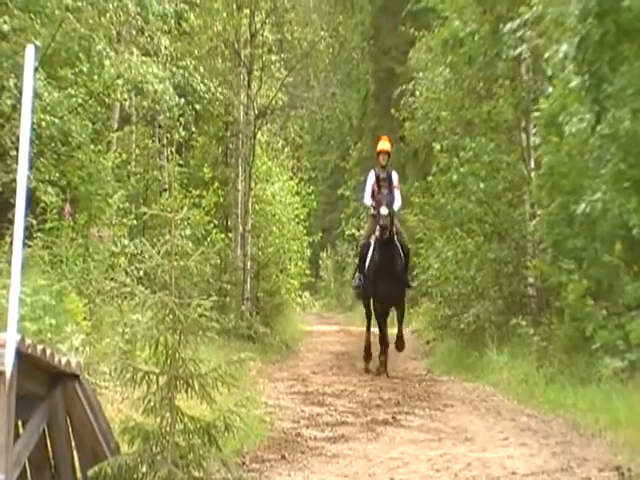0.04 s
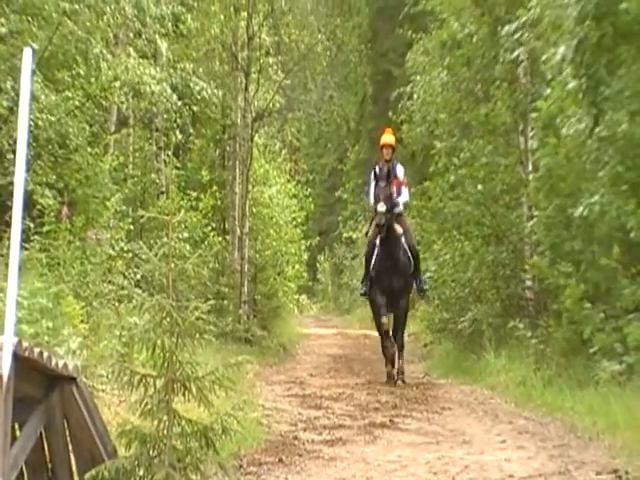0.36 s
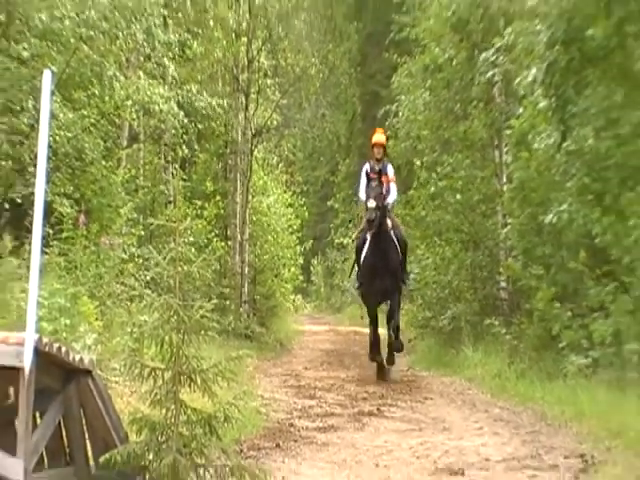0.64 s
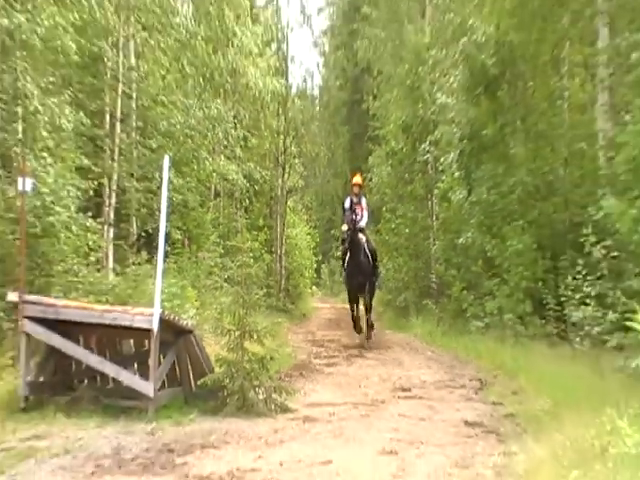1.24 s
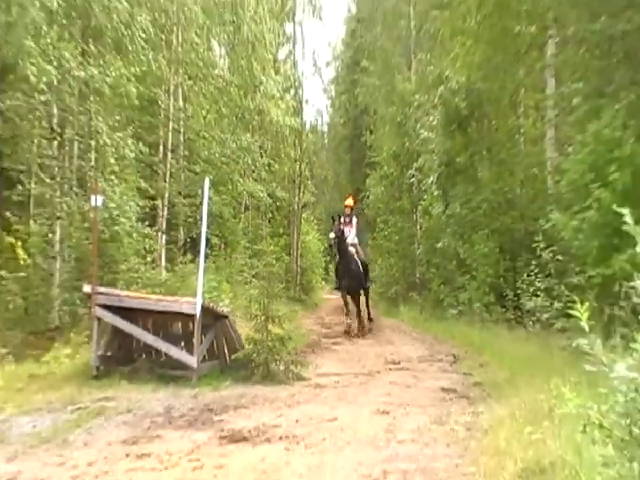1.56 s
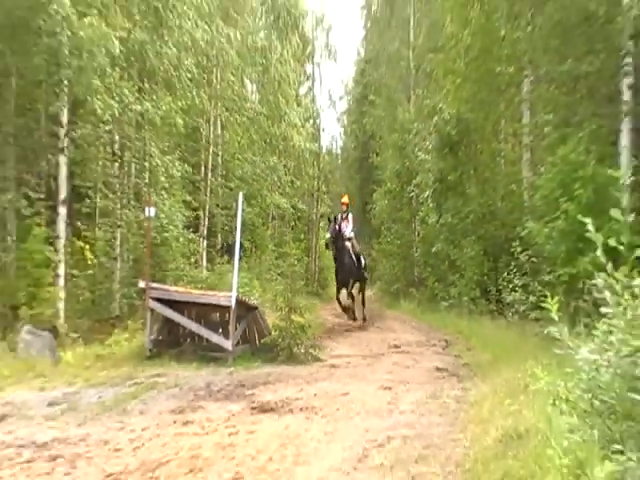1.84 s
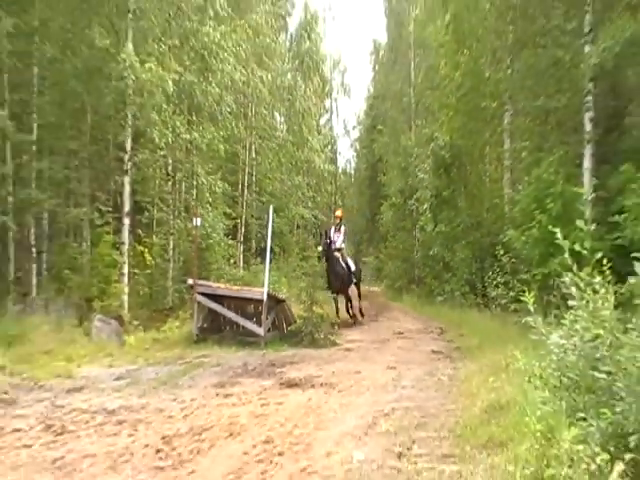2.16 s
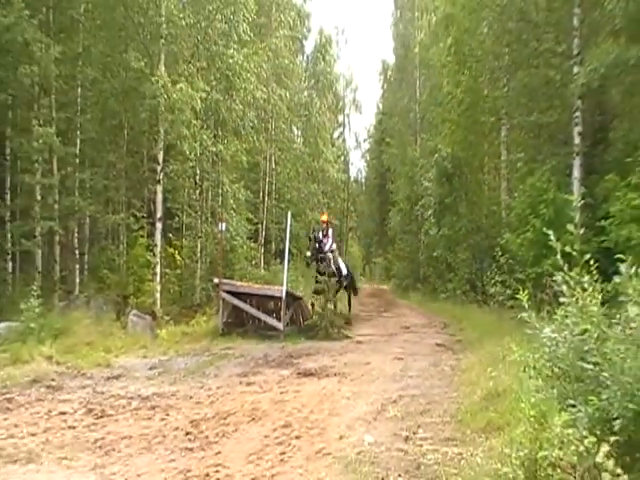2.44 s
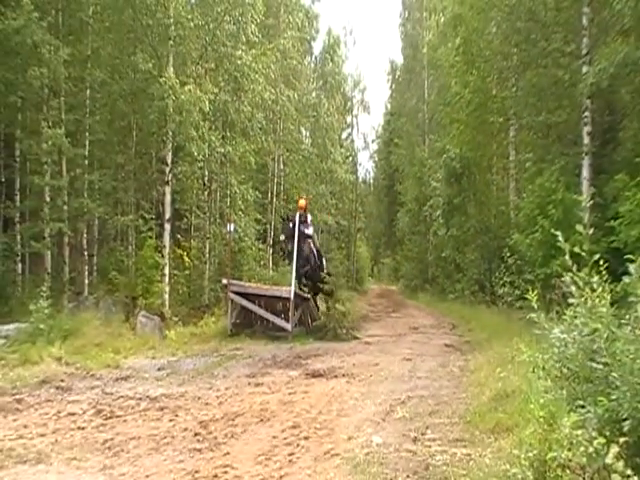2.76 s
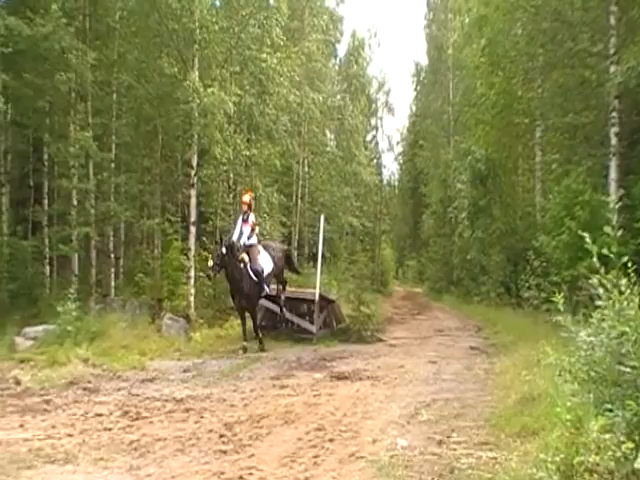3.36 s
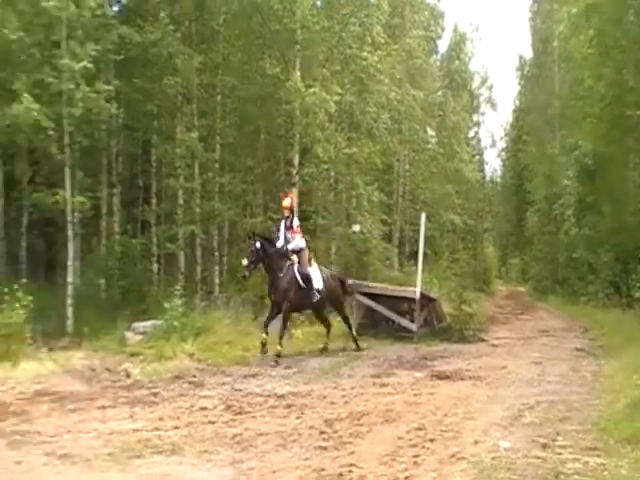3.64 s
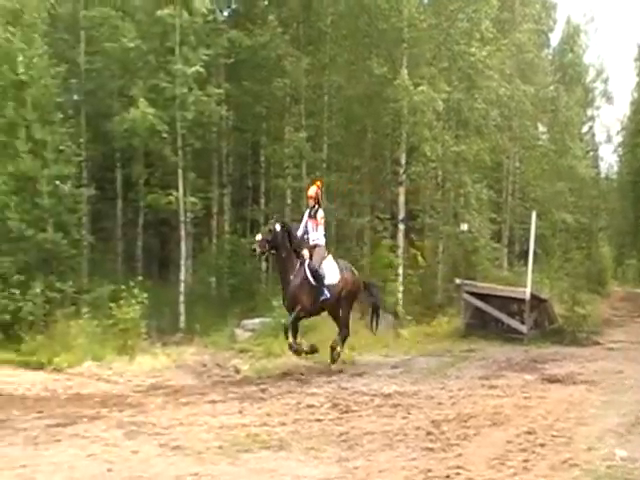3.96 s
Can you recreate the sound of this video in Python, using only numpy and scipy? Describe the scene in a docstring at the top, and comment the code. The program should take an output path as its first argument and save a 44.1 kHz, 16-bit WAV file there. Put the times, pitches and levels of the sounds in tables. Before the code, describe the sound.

A horse canters closer on a sandy forest track, its hooves thudding, crunching grit and clacking on stones, faint at first and louder from about 2 seconds. At 3 seconds a hoof raps a wooden fence. After the landing, at about 3.6 seconds, a steel shoe cracks loudly on stone and gravel sprays, then more hoofbeats follow. Leaves hiss softly throughout, with a slight echo and a few faint microphone clicks.

```python
"""A horse canters up a sandy forest track, jumps a wooden fence and lands close by.
Each hoof thuds into the ground, crunches grit and throws sand; some clack on stones.
A hoof raps the fence boards; after the landing a steel shoe cracks on a stone and gravel flies.
Leaves hiss, tree trunks echo the blows, and the microphone's casing clicks a few times."""
import sys
import numpy as np
from scipy import signal
from scipy.fft import rfft, irfft
from scipy.io import wavfile
from scipy.ndimage import uniform_filter1d

SR = 44100
rng = np.random.default_rng(int(sys.argv[2]) if len(sys.argv) > 2 else 0)


def store_wav(level_fs):
    """Save 16-bit WAV to argv[1]."""
    pcm = np.round(np.clip(np.atleast_2d(level_fs), -1, 1) * 32767)
    wavfile.write(sys.argv[1], SR, pcm.T.astype(np.int16))


N = 176400  # 4 seconds


def undb(db):
    """Turn decibels into a number to multiply by."""
    return 10 ** (np.asarray(db) / 20)


def unit(x):
    """Scale a sound to an average (rms) strength of 1."""
    return x / np.sqrt(np.mean(x ** 2))


def blow(x, db):
    """Scale a hit so that its loudest 4 ms have the given level."""
    power = uniform_filter1d(x ** 2, 176, mode="constant")
    return x * undb(db) / np.sqrt(power.max())


def colour(x, points, size=2048):
    """Shape the tone along a curve of (pitch_hz, gain_db) points; white noise keeps its power."""
    hz, db = np.array(points, float).T
    freqs = np.maximum(np.fft.rfftfreq(size, 1 / SR), 1)
    gains = undb(np.interp(np.log(freqs), np.log(hz), db))
    cepstrum = irfft(np.log(gains))
    cepstrum[1:size // 2] *= 2  # folded forward, so nothing sounds before a hit
    cepstrum[size // 2 + 1:] = 0
    response = irfft(np.exp(rfft(cepstrum)))
    return signal.fftconvolve(x, response / np.linalg.norm(response))[:len(x)]


def low_cut(x, hz, order=2):
    """Take away bass; small things give off little of it."""
    return signal.sosfilt(signal.butter(order, hz, "high", fs=SR, output="sos"), x)


def swell(t, rise_s, decay_s, power=1):
    """Rise in a straight line from t = 0, then fade; a power above 1 shortens the tail."""
    return np.clip(t / rise_s, 0, 1) * np.exp(-(np.maximum(t - rise_s, 0) / decay_s) ** power)


def ring(t, tones):
    """Add up fading tones (pitch_hz, gain_db, ring_s); each drops 60 dB in ring_s."""
    return sum(undb(db) * np.sin(2 * np.pi * hz * t) * np.exp(-np.log(1000) * t / ring_s)
               for hz, db, ring_s in tones)


def add(out, start_s, x):
    """Mix a sound in at its start time."""
    i = int(start_s * SR)
    out[i:i + len(x)] += x[:len(out) - i]


def clumps(per_s=160, depth_db=3):
    """A wobbling gain: soil gives way in uneven lumps."""
    steps = np.arange(N) * per_s / SR
    return undb(depth_db * np.interp(steps, np.arange(N), rng.standard_normal(N)))


def grains(spread_db, per_s=8300):
    """Many tiny collisions in clumps; more spread makes a few stand out."""
    strength = undb(spread_db * np.minimum(rng.standard_exponential(N), 5))
    return unit(clumps() * strength * rng.choice([-1, 1], N) * (rng.random(N) < per_s / SR))


def ticks(per_s=60, level_db=-12):
    """Lone pebbles click among the sand."""
    return unit(rng.uniform(-1.1, 1, N) * (rng.random(N) < per_s / SR)) * undb(level_db)


# tone of coarse grit: pitch_hz, gain_db
GRIT_TONE = [(60, -28), (200, -14.5), (380, -9.5), (580, 0), (800, -6.5), (1200, -6), (1700, -5.5),
             (2600, -14.5), (5000, -26), (11000, -50)]
# tone of fine sand: pitch_hz, gain_db
SAND_TONE = [(200, -53), (1000, -22), (2200, 0.5), (4300, 2.5), (6000, 0), (8500, 1), (10000, -3.5),
             (11500, -26)]
# hooves ploughing through the track: start_s, grit_db, sand_db, rise_s, decay_s
SCUFFS = [(-.01, -54.5, -59, 0.0088, 0.13), (0.054, -62, -54.5, 0.0062, 0.039),
          (0.152, -51, -48, 0.0028, 0.0094), (0.287, -61, -54.5, 0.0027, 0.083),
          (0.333, -53, -49.5, 0.016, 0.057), (0.467, -56, -63.5, 0.0052, 0.07),
          (0.548, -53, -50, 0.046, 0.13), (.68, -56.5, -58, 0.019, 0.12), (0.77, -55, -52.5, 0.031, 0.16),
          (0.998, -48.5, -57.5, 0.0056, 0.054), (1.07, -50.5, -67, 0.027, 0.047),
          (1.147, -53, -58.5, 0.0046, 0.094), (1.245, -53.5, -58, 0.0025, 0.045),
          (1.538, -41.5, -53, 0.005, 0.023), (1.674, -44.5, -69, 0.0025, 0.047),
          (1.772, -49.5, -50.5, 0.0026, 0.056), (1.902, -55.5, -64, 0.0025, 0.071),
          (1.954, -46, -59, 0.021, 0.019), (2.047, -43.5, -40, 0.0015, 0.043),
          (2.13, -43, -45, 0.0098, 0.022), (2.18, -42.5, -41.5, 0.0033, 0.046),
          (2.273, -52.5, -49.5, 0.0031, 0.27), (2.39, -36.5, -45.5, 0.0067, 0.033),
          (2.408, -34.5, -44.5, 0.0048, 0.036), (2.488, -37, -36, 0.014, 0.042),
          (2.573, -43, -44.5, 0.021, 0.028), (2.717, -74, -41, 0.0025, 0.14),
          (2.765, -35, -49, 0.0027, 0.016), (2.893, -51, -49.5, 0.003, 0.052),
          (2.965, -38, -48, 0.011, 0.02), (3.145, -40.5, -54, 0.0027, 0.016),
          (3.28, -41.5, -43.5, 0.017, 0.037), (3.354, -34, -35.5, 0.0018, 0.024),
          (3.389, -37.5, -43, 0.038, 0.032), (3.526, -34, -31.5, 0.0044, 0.017),
          (3.628, -34, -53, 0.011, 0.012), (3.749, -60, -38.5, 0.061, 0.018),
          (3.816, -40.5, -40.5, 0.0017, 0.068)]


def hoof_scuffs(t):
    """Coarse grit crunches under each hoof while fine sand hisses away."""
    grit_power, sand_power = 0, 0
    for start_s, grit_db, sand_db, rise_s, decay_s in SCUFFS:
        shape = swell(t - start_s, rise_s, decay_s, power=1.18)
        grit_power += (undb(grit_db) * shape) ** 2
        sand_power += (undb(sand_db) * shape) ** 2
    grit = grains(spread_db=2) * np.sqrt(grit_power)
    sand = (grains(spread_db=0) + ticks()) * np.sqrt(sand_power)
    return colour(grit, GRIT_TONE) + colour(sand, SAND_TONE)


# soil falling back behind the horse: time_s, level_db
TRICKLE_LEVELS = [(1.6, -58), (2.2, -58), (2.7, -49), (3.2, -52), (3.7, -51), (4, -55.5)]


def soil_trickle(t):
    """Kicked-up sand and grit patter down between the hoofbeats."""
    sand = colour(grains(spread_db=3), SAND_TONE)
    grit = colour(grains(spread_db=3), GRIT_TONE) * undb(-2)
    times_s, levels_db = np.array(TRICKLE_LEVELS).T
    return (sand + grit) * undb(np.interp(t, times_s, levels_db))


# tone of the leaves: pitch_hz, gain_db
LEAF_TONE = [(15, -84), (25, -38), (59, -56), (94, -16), (187, -3.5), (381, -8.5), (573, 0.5), (840, -3),
             (1060, -2.5), (1470, -9), (1670, -7.5), (2450, -12), (8310, -15.5), (9680, -21), (11000, -35),
             (14300, -4), (22000, -120)]


def leaves():
    """Leaves give a soft, steady hiss."""
    return colour(rng.standard_normal(N), LEAF_TONE) * undb(-58.5)


# tone of packed earth: pitch_hz, gain_db
EARTH_TONE = [(25, -4), (65, -10), (115, 2.5), (180, 1.5), (300, -1), (500, -0.5), (900, -15),
              (3000, -59.5)]
# weight coming onto a hoof: start_s, level_db, decay_s, pitch_hz
THUDS = [(0.061, -47.5, 0.011, 259), (0.344, -54, 0.014, 270), (0.472, -49.5, 0.019, 233),
         (0.603, -52.5, 0.018, 237), (1.004, -40.5, 0.0028, 236), (1.021, -41, 0.004, 327),
         (1.156, -48, 0.011, 240), (1.425, -40, 0.0089, 283), (1.553, -41.5, 0.0046, 230),
         (1.97, -48.5, 0.016, 172), (2.061, -44, 0.013, 274), (2.19, -46.5, 0.025, 202),
         (2.413, -54, 0.022, 286), (2.518, -41.5, 0.027, 222), (2.582, -39.5, 0.017, 167),
         (2.777, -37, 0.0053, 142), (3.32, -48, 0.035, 130), (3.357, -43, 0.01, 188),
         (3.537, -39.5, 0.046, 141), (3.638, -34, 0.017, 230), (3.821, -49, 0.024, 257)]


def hoof_thuds(t, rise_s=0.0027):
    """The ground takes the weight: one dull push and a short rumble of packed earth."""
    out = np.zeros(N)
    for start_s, level_db, decay_s, pitch_hz in THUDS:
        burst = rng.standard_normal(len(t)) * swell(t, rise_s, decay_s)
        earth = blow(colour(burst, EARTH_TONE), db=0)
        push = blow(np.sin(2 * np.pi * pitch_hz * t) * swell(t, rise_s, decay_s=0.0053), db=-2.5)
        add(out, start_s, blow(low_cut(earth, pitch_hz / 2) + push, level_db))
    return out


def trunk_echo(x, ring_s=0.47, top_hz=5400):
    """Tree trunks send back many small, duller reflections that die away."""
    t = np.arange(SR) / SR
    tail = rng.standard_normal(SR) * swell(t, ring_s / 40, ring_s / np.log(1000))
    dulling = signal.butter(1, top_hz, fs=SR, output="sos")
    tail = signal.sosfilt(dulling, tail / np.linalg.norm(tail))
    return low_cut(signal.fftconvolve(x, tail)[:N], hz=520) * undb(-15)


def rough_knock(t, decay_s, tones, roughness=0.11):
    """One blow and a short crunch after it set the given tones ringing."""
    force = roughness * rng.standard_normal(len(t)) * np.exp(-t / decay_s)
    force[0] = 1
    return signal.fftconvolve(force, ring(t, tones))[:len(t)]


# tone of a sharp crack: pitch_hz, gain_db
CRACK_TONE = [(200, -16), (900, -5), (2000, 6.5), (4000, 1.5), (6000, -3.5), (8700, 7), (11000, 0)]


def crack(t, level_db, decay_s, pitch_hz):
    """A stone snaps and crumbles in a bright burst; eight pebbles ring around one pitch."""
    burst = rng.standard_normal(len(t)) * np.exp(-t / decay_s)
    burst[0] += undb(7.5)  # the first snap
    pitches_hz = pitch_hz * np.exp(0.21 * rng.standard_normal(8))
    pebbles = ring(t, [(hz, 0, 0.01) for hz in pitches_hz])
    ringing = signal.fftconvolve(burst, pebbles)[:len(t)]
    mix = unit(colour(burst, CRACK_TONE)) + undb(2.5) * unit(colour(ringing, CRACK_TONE))
    return blow(mix, level_db)


# tones of the hollow hoof: pitch_hz, gain_db, ring_s
HOOF_TONES = [(634, -3, 0.028), (1110, -4.5, 0.0066), (1632, -21, 0.045)]
# hooves meeting stones: start_s, knock_db, knock_hz, ring_s, crack_db, crack_decay_s, crack_hz
CLACKS = [(0.082, -44.5, 634, .012, -71, 0.0024, 4000), (0.2826, -49, 737, 0.0087, -43.5, 0.00062, 4250),
          (0.344, -40.5, 1010, 0.02, -63, 0.0024, 4000), (0.604, -38, 550, 0.029, -68, 0.0019, 5000),
          (.699, -42.5, 750, 0.0042, -52, 0.0024, 3010), (1.156, -44, 584, 0.13, -57, 0.0076, 4000),
          (1.309, -45.5, 610, 0.028, -65, 0.0017, 4000), (1.427, -29.5, 470, 0.01, -50.5, 0.0026, 1470),
          (1.778, -37, 1330, 0.0043, -37.5, 0.0054, 10500), (1.819, -54, 1400, 0.0042, -46, 0.0006, 10300),
          (1.995, -43.5, 570, 0.017, -51.5, 0.0014, 4060), (2.049, -40, 1380, 0.0027, -37.5, 0.0023, 4370),
          (2.282, -30.5, 1700, 0.0047, -34.5, 0.0065, 9940), (2.39, -36, 1090, 0.01, -31.5, 0.0028, 4500),
          (2.473, -81, 1500, 0.0052, -29, 0.0097, 8920), (2.516, -50, 1530, .005, -32, 0.0028, 4630),
          (2.578, -28.5, 1050, 0.0051, -43, 0.0024, 2500), (2.714, -17.5, 920, 0.0012, -20.5, 0.0026, 7070),
          (2.873, -35.5, 940, 0.0037, -48, 0.0083, 2620), (2.906, -48, 1700, 0.0071, -43, 0.0054, 3060),
          (3.0928, -52, 1190, .006, -28, 0.0023, 4970), (3.121, -35, 1180, 0.0019, -46, 0.0045, 3530),
          (3.151, -32.5, 1640, 0.0031, -61, 0.016, 2300), (3.69, -31, 1000, 0.0085, -32.5, 0.0065, 8040),
          (3.697, -35.5, 690, 0.051, -22.5, 0.00072, 4800), (3.743, -28, 1800, 0.0053, -52, 0.0075, 2400),
          (3.817, -39, 1510, 0.0047, -24, 0.0056, 7650), (3.97, -46, 690, 0.026, -47, 0.0015, 4960)]


def hoof_clacks(t):
    """A gritty knock, higher on harder ground, rings the hoof; the stone adds a crack."""
    out = np.zeros(N)
    for start_s, knock_db, knock_hz, ring_s, crack_db, crack_decay_s, crack_hz in CLACKS:
        knock = rough_knock(t, crack_decay_s, [(knock_hz, 0, ring_s)] + HOOF_TONES)
        knock = blow(low_cut(knock, knock_hz / 1.44, order=3), knock_db)
        add(out, start_s, knock + crack(t, crack_db, crack_decay_s, crack_hz))
    return out


# small clicks right at the microphone: start_s, level_db, pitch_hz
CASING_CLICKS = [(1.126, -41.5, 837), (1.234, -46.5, 1050), (2.836, -39, 626), (2.997, -39.5, 1000)]


def casing_clicks(t, decay_s=0.0034, ring_s=0.034):
    """The microphone's casing ticks and rings briefly."""
    out = np.zeros(N)
    for start_s, level_db, pitch_hz in CASING_CLICKS:
        knock = rough_knock(t, decay_s, [(pitch_hz, 0, ring_s)])
        tick = crack(t, level_db - 4, decay_s, pitch_hz=3900)
        add(out, start_s, blow(low_cut(knock, pitch_hz / 2), level_db) + tick)
    return out


# tones of the fence boards: pitch_hz, gain_db, ring_s
BOARD_TONES = [(371, -4, 0.15), (571, 3, 0.125), (620, -7, .06), (505, -9, 0.06), (824, 4, 0.016),
               (1270, -3, 0.03), (1740, 5, 0.02), (2160, 10, 0.024)]
# a hoof skipping over the top, duller each time: start_s, level_db, top_hz
FENCE_RAPS = [(3.0205, -31, 5000), (3.024, -24, 3520), (3.0293, -27.5, 755)]


def fence_raps(t):
    """A hoof scrapes and skips over boards that ring and rattle; each later rap sounds duller."""
    out = np.zeros(N)
    for start_s, level_db, top_hz in FENCE_RAPS:
        tones = [(hz, db - 20 * np.log10(1 + (hz / top_hz) ** 2), ring_s)
                 for hz, db, ring_s in BOARD_TONES]
        boards = ring(t, tones)
        add(out, start_s, blow(boards, level_db))
    scrape = colour(rng.standard_normal(len(t)) * swell(t, rise_s=0.0051, decay_s=0.0082), GRIT_TONE)
    shaking = rng.standard_normal(len(t)) * np.exp(-t / 0.02)
    rattle = signal.fftconvolve(shaking, boards)[:len(t)]  # in the tones of the last, dullest rap
    add(out, FENCE_RAPS[0][0], blow(scrape, db=-24.5) + blow(rattle, db=-38))
    return low_cut(out, hz=174)


# tones of the steel shoe: pitch_hz, gain_db, ring_s
SHOE_TONES = [(613, -13.5, 0.069), (1160, -4, 0.028), (1625, 5, 0.023), (4760, -3, 0.034), (5005, 1, 0.026),
              (5750, 1, 0.016), (6830, -2, 0.015), (8800, 9, 0.011), (9600, -13, 0.016)]
# one strike and two skips: start_s, level_db
SHOE_HITS = [(3.5652, -14), (3.5685, -26.5), (3.58, -35)]


def shoe_strike(t):
    """A steel shoe cracks on a stone, skips and rings briefly."""
    out = np.zeros(N)
    steel = low_cut(ring(t, SHOE_TONES), hz=700)
    for start_s, level_db in SHOE_HITS:
        stone = crack(t, level_db - 1.5, decay_s=0.001, pitch_hz=7880)
        add(out, start_s, blow(steel, level_db) + stone)
    return out


# tone of flying gravel: pitch_hz, gain_db
GRAVEL_TONE = [(300, -35), (600, -20), (2000, -1.5), (3500, 2.5), (4800, 0.5), (5800, 3), (7000, 8.5),
               (8800, 2.5), (11000, -6.5)]


def gravel_spray(t):
    """Gravel flies from under the shoe as it strikes."""
    stream = rng.standard_normal(N) * np.sqrt(clumps()) + ticks()
    shape = swell(t - SHOE_HITS[0][0], rise_s=0.0015, decay_s=0.099)
    return colour(stream * shape, GRAVEL_TONE) * undb(-29.5)


# how flying soil spreads to left and right: pitch_hz, gain_db
SOIL_SPREAD = [(400, 6.5), (1100, -21), (2200, -15), (4500, 7)]


def scene():
    """Blows and soil come from ahead; leaves, casing clicks and the echo spread wider."""
    t = np.arange(N) / SR
    hit_t = t[:SR // 4]  # each hit gets a quarter of a second
    blows = hoof_thuds(hit_t) + hoof_clacks(hit_t) + fence_raps(hit_t) + shoe_strike(hit_t)
    soil, soil_side = (hoof_scuffs(t) + gravel_spray(t) + soil_trickle(t) for _ in range(2))
    echo, echo_side = trunk_echo(blows), trunk_echo(blows)
    middle = blows + soil + echo + leaves() + casing_clicks(hit_t)
    side = 0.29 * colour(soil_side, SOIL_SPREAD) + 0.3 * echo_side
    side += 0.8 * leaves() + 1.04 * casing_clicks(hit_t)
    side += 0.046 * signal.hilbert(middle).imag  # the two microphone openings are slightly out of step
    lean_right_db = 0.97
    left = (middle + side) * undb(-lean_right_db / 2)
    right = (middle - side) * undb(lean_right_db / 2)
    return np.array([left, right])


def record(dry):
    """The camera rounds off the hardest crack and cuts the deep rumble and the highest treble."""
    ceiling, top_hz = 0.9, 11050
    rounded = ceiling * np.tanh(dry / ceiling)
    treble_cut = signal.ellip(10, .2, 70, top_hz, fs=SR, output="sos")
    return signal.sosfilt(treble_cut, low_cut(rounded, hz=67))


dry = scene()
out = record(dry)
store_wav(out)
```